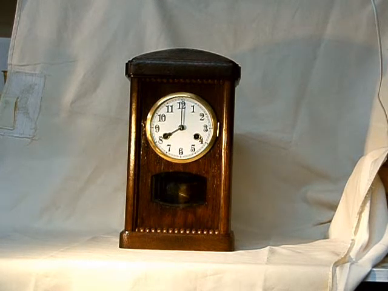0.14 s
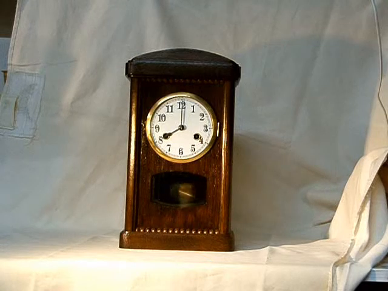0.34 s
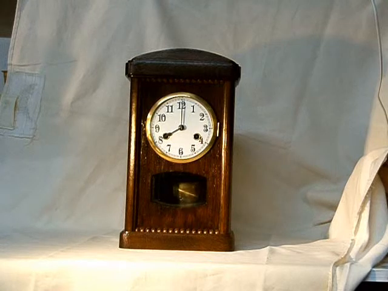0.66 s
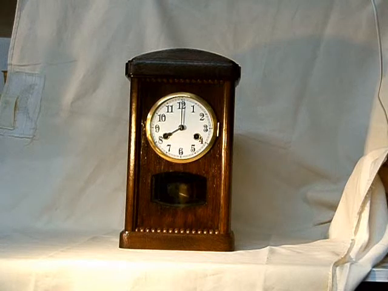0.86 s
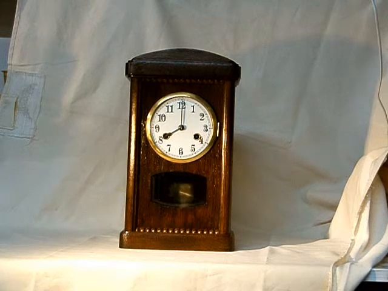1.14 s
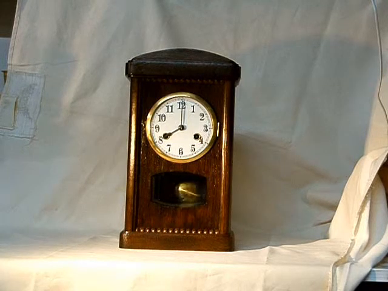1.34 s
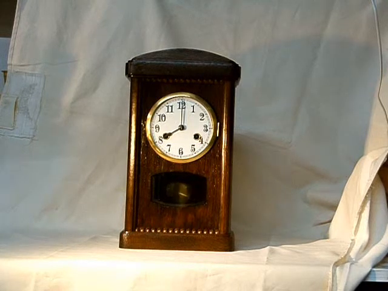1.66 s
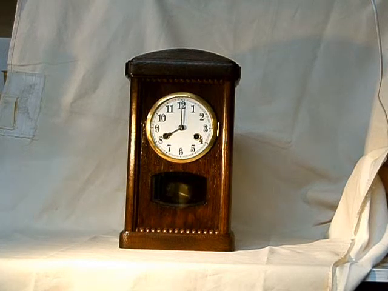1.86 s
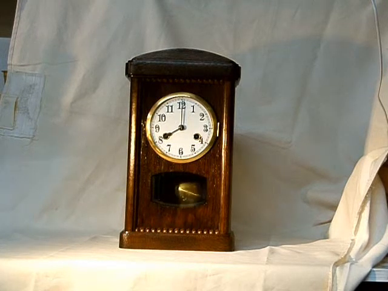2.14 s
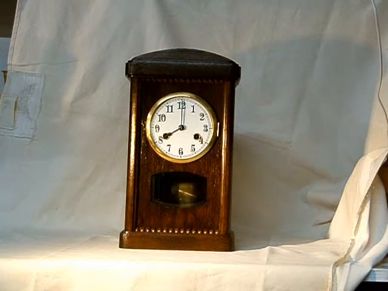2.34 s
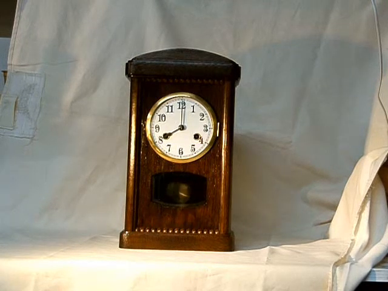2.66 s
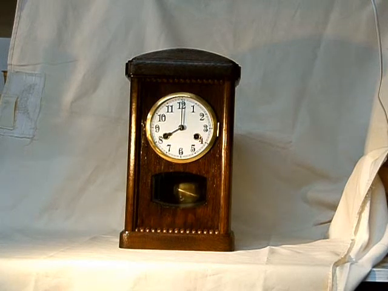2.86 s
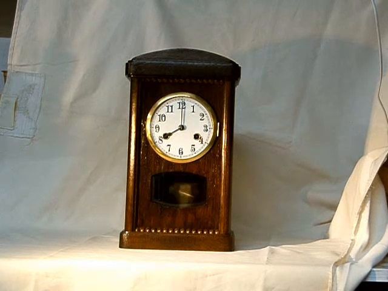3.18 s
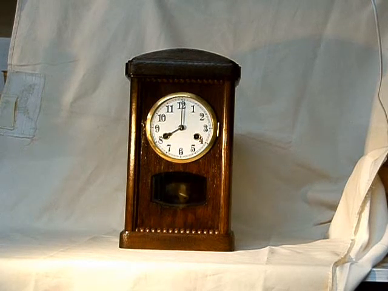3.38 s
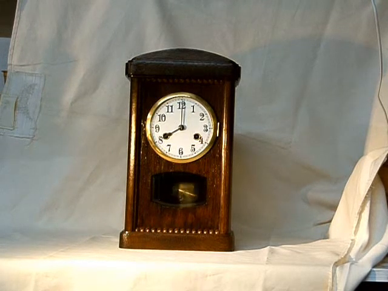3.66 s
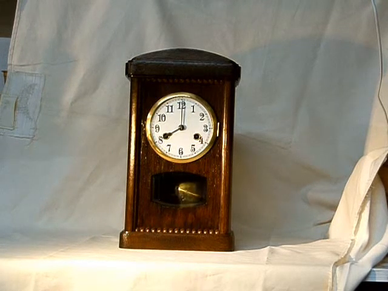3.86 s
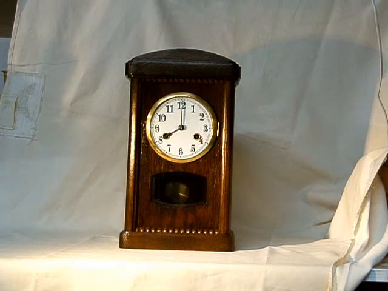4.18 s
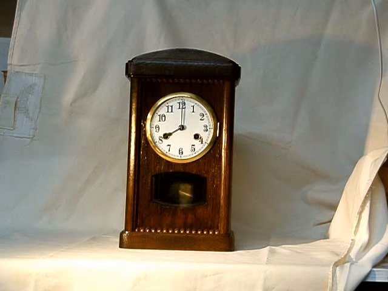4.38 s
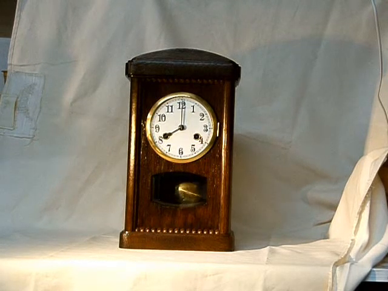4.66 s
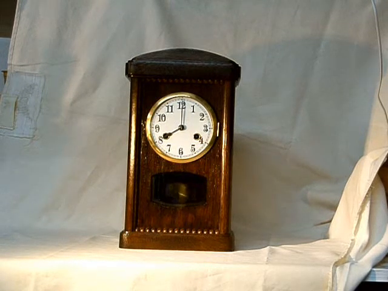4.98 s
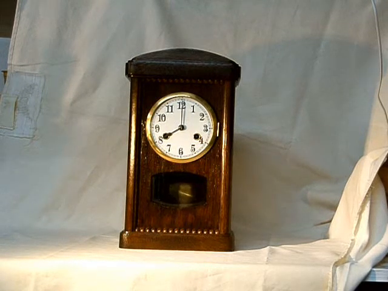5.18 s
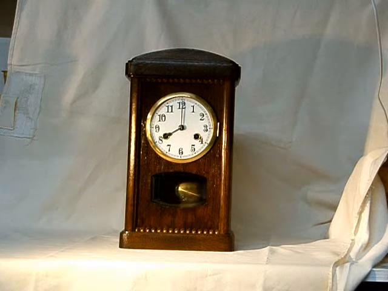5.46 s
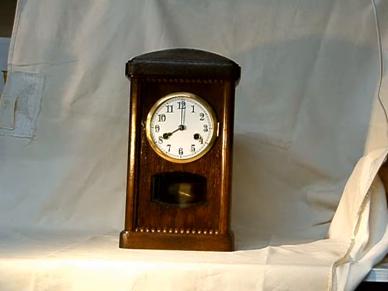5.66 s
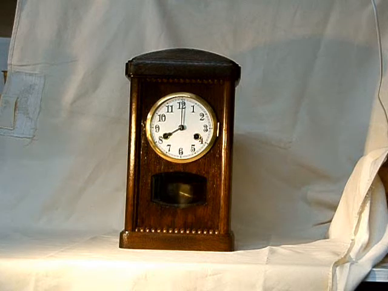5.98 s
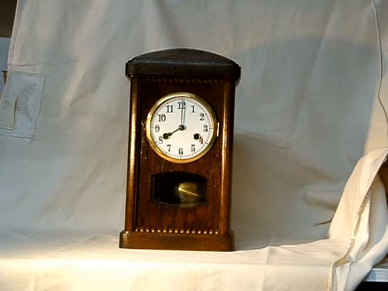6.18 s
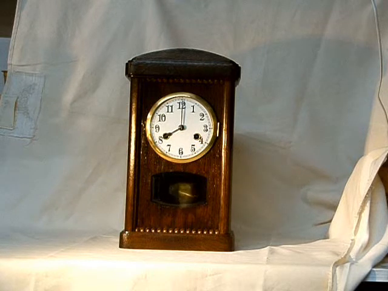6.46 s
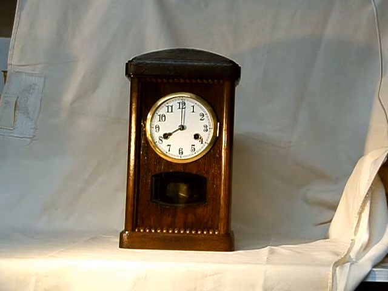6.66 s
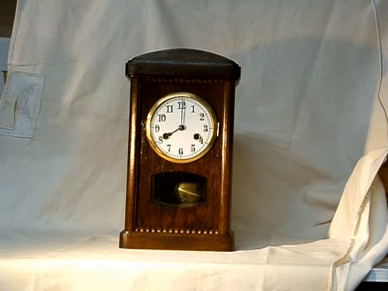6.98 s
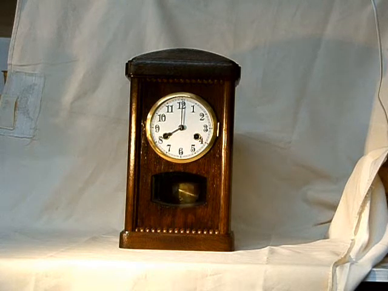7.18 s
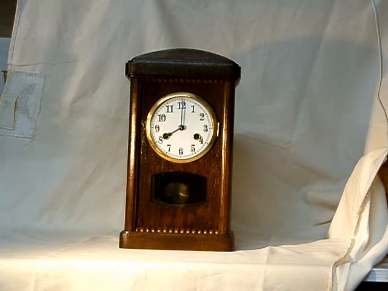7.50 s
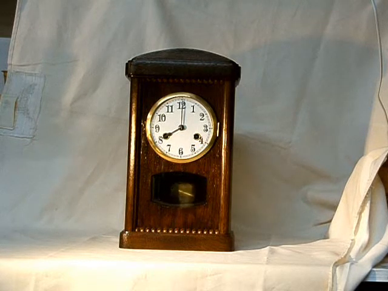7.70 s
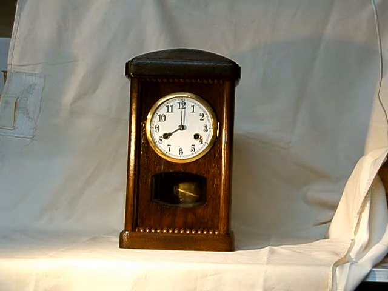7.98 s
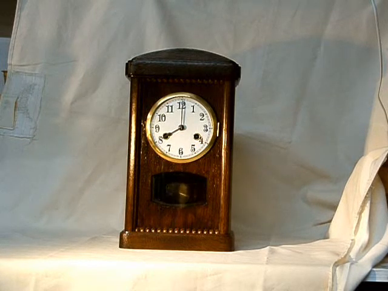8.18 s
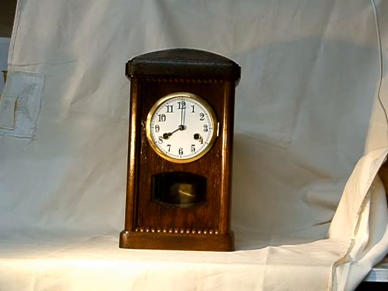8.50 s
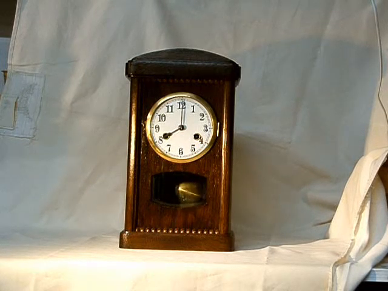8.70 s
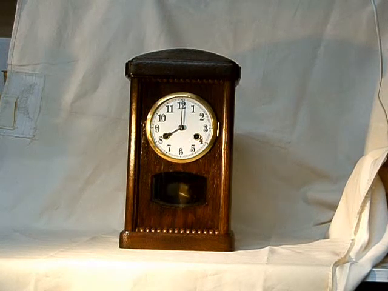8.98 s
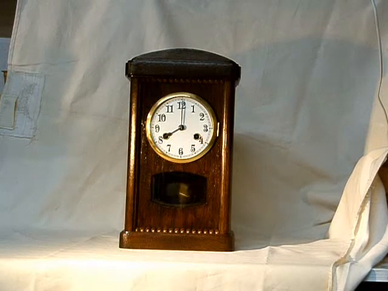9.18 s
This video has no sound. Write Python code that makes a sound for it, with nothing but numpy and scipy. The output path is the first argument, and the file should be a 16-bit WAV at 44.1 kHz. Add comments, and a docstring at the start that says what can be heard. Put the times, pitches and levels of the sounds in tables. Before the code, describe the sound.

A wooden mantel clock is partway through striking the hour, its wire gong already ringing. A padded hammer hits five more times, evenly, about a second and a half apart. Each blow knocks the case and adds a shimmering metallic tone to the lingering ring. Two faint lever clicks come early on, and a last one follows the strokes as the gong fades. The room is small and quiet, with steady microphone hiss.

```python
"""A wooden mantel clock is striking in a quiet room, heard through a hissy mono microphone.
At first its coiled wire gong still rings from earlier strokes. Then a padded hammer hits it five
more times, about 1.5 s apart, with two faint lever clicks along the way. Each blow knocks the case
and adds to what still rings, so every stroke has its own colour.
Last, the striking gears stop with a faint click while the gong rings on."""
import sys
import numpy as np
from scipy import signal
from scipy.fft import rfft, irfft, next_fast_len
from scipy.io import wavfile

SR = 44100
rng = np.random.default_rng(int(sys.argv[2]) if len(sys.argv) > 2 else 0)


def wav_out(sig):
    """Save sig, one row per channel (or a flat mono array), as 16-bit PCM at SR to the path in sys.argv[1]."""
    wavfile.write(sys.argv[1], SR, np.round(np.clip(np.atleast_2d(sig).T, -1, 1) * 32767).astype(np.int16))


N = 411894
TIME = np.arange(N) / SR
TOP_HZ = 15450  # the recorder cuts off sound above this pitch

# microphone hiss and room rumble: (frequency [Hz], relative level [dB])
HISS_SHAPE = [(30, -5.5), (70, -4), (140, 1.5), (250, 4), (550, 1.5), (1000, -0.5), (1900, -2), (2400, -2),
              (3000, -4.5), (5000, -5.5), (8000, -8.5), (11000, -11), (15000, -15.5)]
# thin electronic whine: (frequency [Hz], level [dB])
WHINE_TONES = [(7843, -65), (7873, -64), (8129, -66), (8158, -65)]
# clicks of the levers in the clockwork: (time [s], level [dB], centre frequency [Hz])
LEVER_CLICKS = [(.458, -48, 4300), (2.812, -55, 2700), (8.434, -45, 2100), (8.438, -45, 520),
                (8.462, -48, 900)]
# A mode is one tone that an object rings at. Its fade time, t60, is how long it takes to drop 60 dB.
# modes of the wooden case: (frequency [Hz], relative level [dB], fade time [s])
CASE_MODES = [(208, -51, 0.09), (330.6, -35.5, 0.14), (520, -47, 0.14), (750, -46, 0.081),
              (1116, -41, 0.059), (1717, -39, 0.068), (2210, -43, 0.053), (2514, -37, 0.033),
              (2863, -46, 0.069), (3330, -41.5, 0.064)]
# loudness along the "ladder", the gong's row of high modes: (frequency [Hz], relative level [dB])
LADDER_SHAPE = [(8800, -64), (9500, -59), (10100, -61), (11250, -64), (11900, -71), (12740, -56),
                (13600, -57.5), (13960, -53), (14300, -61), (14630, -57.5), (15400, -65)]
# strong modes of the gong: (frequency [Hz], relative level [dB], fade time [s],
# share of the ringing that survives a blow [0-1], rise time [s], pitch bend under the hammer [Hz])
GONG_MODES = [(230.19, -42, 7.1, 1, .04, 0), (389.95, -26.3, 1.1, .8, .007, -42),
              (584.75, -51, 22, 1, .03, 0), (816.24, -33.9, 5.5, 1, .016, -35),
              (1081.16, -41.2, 14.6, .67, .008, 0), (1373.49, -37.7, 8.4, .7, .03, 0),
              (1694.88, -48.2, 11.2, 1, .006, 10), (2041.17, -38.1, 7.8, 1, .005, 12),
              (2418.79, -43, 6, .94, .055, 0), (2824.72, -44.3, 6.8, 1, .005, 0),
              (3260.94, -43.7, 4.3, .99, .006, 42), (3730.77, -55, 5.2, .84, .008, 0),
              (4759.37, -52.3, 3.2, .83, .008, 0), (6520.61, -55.3, 3, .86, .008, 0)]
# hammer strokes; those at negative times are already ringing when the sound begins:
# (time [s], force [dB], brightness [dB per octave], sizzle of the contact [dB])
HAMMER_STROKES = [(-2.078128, 4, .6, 0), (-.598251, -1, -.4, 0), (.921546, -1.5, -.1, 2.5),
                  (2.419508, -1.4, -.5, -2), (3.907069, -1.2, -.3, 0), (5.423786, -1, .6, 2),
                  (6.932008, .1, .1, -1)]


def undb(db):
    """Turn decibels into a number to multiply a sound by."""
    return 10 ** (np.asarray(db) / 20)


def fade(age, t60):
    """A natural fade that is 60 dB down after t60 seconds."""
    return np.exp(-np.log(1000) * age / t60)


def swell(age, hz, rise):
    """The start of a mode: low bending waves travel more slowly, so they arrive after the high ones."""
    lag_s = 0.0044  # how far a 250 Hz wave trails the treble
    delay = lag_s * max(np.sqrt(1000 / hz) - .7, 0) / 1.3
    return 1 - np.exp(-np.maximum(age - delay, 0) / rise)


def add(out, sound, start):
    """Mix a sound in at a start time, cut to the length of the track."""
    i = int(round(start * SR))
    lo, hi = max(i, 0), min(i + len(sound), N)
    if hi > lo:
        out[lo:hi] += sound[lo - i:hi - i]


def noise(shape, size):
    """Noise of strength 1, coloured by points of (frequency [Hz], relative level [dB])."""
    hz, db = np.transpose(shape)
    padded = next_fast_len(size)
    bins = np.maximum(np.fft.rfftfreq(padded, 1 / SR), 1)
    gains = undb(np.interp(np.log(bins), np.log(hz), db))
    coloured = irfft(rfft(rng.standard_normal(padded)) * gains, padded)[:size]
    return coloured / coloured.std()


def ring(modes, size, rise):
    """Pure tones that swell and fade, from rows of (frequency [Hz], level [dB], fade time [s])."""
    age, out = TIME[:size], np.zeros(size)
    for hz, db, t60 in modes:
        tone = np.sin(2 * np.pi * (hz * age + rng.random()))
        out += undb(db) * swell(age, hz, rise) * fade(age, t60) * tone
    return out


def microphone_hiss(hiss_db=-48):
    """Steady hiss with a faint cluster of whining electronic tones."""
    whine = sum(undb(db) * np.sin(2 * np.pi * (hz * TIME + rng.random())) for hz, db in WHINE_TONES)
    return undb(hiss_db) * noise(HISS_SHAPE, N) + whine


def room(sound, echo_db, t60=.4):
    """A small furnished room adds soft echoes, starting 6 ms after the sound."""
    age = TIME[:SR // 2]
    echoes = noise([(100, -7), (3000, 7), (15000, -10)], len(age)) * fade(age, t60) * (age > .006)
    return sound + undb(echo_db) * signal.fftconvolve(sound, echoes / np.linalg.norm(echoes))[:N]


def lever_clicks(t60=0.083):
    """Small dry clicks as levers in the clockwork drop."""
    age, out = TIME[:SR // 4], np.zeros(N)
    for start, db, hz in LEVER_CLICKS:
        click = noise([(hz / 4, -36), (hz / 2, -9), (hz, 0), (hz * 2, -18), (hz * 4, -36)], len(age))
        add(out, undb(db) * click * fade(age, t60), start)
    return out


def case_knocks(knock_db=3, rise=0.0028, tap_db=-42, tap_t60=0.033):
    """The hammer taps the wire, and the blow passes through the gong's stand into the wooden case."""
    age, out = TIME[:SR // 2], np.zeros(N)
    knock = undb(knock_db) * ring(CASE_MODES, len(age), rise)
    for start, force_db, _, sizzle_db in HAMMER_STROKES:
        tap = noise([(700, -16), (1700, -27), (2400, 2), (3300, -10), (4200, -9), (12000, -28)], len(age))
        tap *= undb(tap_db + sizzle_db) * fade(age, tap_t60)
        add(out, undb(force_db) * (knock + tap), start)
    return out


def gong_shimmer(low_db=-71, high_db=-68, typical_t60=4.5, rise=0.0053, wash_db=-51, count=48):
    """The coil's many faint modes: a thin shimmer over a soft wash of noise after each stroke."""
    age, out = TIME[:3 * SR], np.zeros(N)
    place = (np.arange(count) + rng.random(count)) / count  # 0 is the lowest pitch, 1 the highest
    hz = 2200 + place * (TOP_HZ - 2200)
    db = low_db + (high_db - low_db) * place + 3 * rng.standard_normal(count)
    t60 = typical_t60 * rng.uniform(.7, 1.4, count)
    shimmer = ring(zip(hz, db, t60), len(age), rise)
    for start, force_db, _, sizzle_db in HAMMER_STROKES:
        wash = noise([(150, -20), (700, 9.5), (2300, 8), (4500, -1),
                      (6000, 3.5), (9000, 0), (14000, -25)], len(age))
        wash *= undb(wash_db) * fade(age, t60=2.9) * (1 - np.exp(-age / rise))
        add(out, undb(force_db + sizzle_db) * (shimmer + wash), start)
    return out


def gong_ladder(first_hz=8839, first_gap_hz=645.5, shrink_hz=29.6, survives=.6, rise=0.0074, count=16):
    """List the gong's high modes, which are like ladder rungs crowding together towards the top."""
    rung = np.arange(count)
    hz = first_hz + first_gap_hz * rung - shrink_hz * rung * (rung - 1) / 2
    db = np.interp(hz, *np.transpose(LADDER_SHAPE))
    t60 = np.geomspace(3, 8, count)  # higher rungs ring longer
    return [(*mode, survives, rise, 0) for mode in zip(hz, db, t60)]


def gong_mode(hz, db, t60, survives, rise, bend_hz, contact_s=0.018):
    """One mode through all strokes: a blow in step with the ringing builds it, one out of step thins it."""
    out, ringing = np.zeros(N, complex), 0j  # complex numbers hold both the size and timing of a swing
    spin_and_fade = 2j * np.pi * hz - np.log(1000) / t60
    octaves = np.log2(min(hz, 5000) / 1000)  # brightness treats all modes above 5000 Hz alike
    sizzle_share = 0.4 * hz / TOP_HZ
    ends = [stroke[0] for stroke in HAMMER_STROKES[1:]] + [N / SR]
    for (start, force_db, bright_db, sizzle_db), end in zip(HAMMER_STROKES, ends):
        span = slice(*np.searchsorted(TIME, [start, end]))
        age = TIME[span] - start
        blow = undb(db + force_db + bright_db * octaves + sizzle_db * sizzle_share)
        # while the pad touches the wire, it muffles the old ringing and bends the new pitch
        contact = np.exp(-age / contact_s)
        old = ringing * (survives + (1 - survives) * contact)
        new = blow * swell(age, hz, rise) * np.exp(-2j * np.pi * bend_hz * contact_s * contact)
        out[span] = (old + new) * np.exp(spin_and_fade * age)
        ringing = (ringing * survives + blow) * np.exp(spin_and_fade * (end - start))
    return np.real(out * np.exp(2j * np.pi * rng.random()))


def gong(gain_db=0.38, top_beat_depth=0.21, typical_beat_hz=5):
    """The coiled wire rings; the higher a mode, the more it beats (wavers) with a close neighbour."""
    out = np.zeros(N)
    for hz, *settings in GONG_MODES + gong_ladder():
        pace, phase = rng.random(2)
        beat = np.sin(2 * np.pi * (typical_beat_hz * (.5 + pace) * TIME + phase))
        out += gong_mode(hz, *settings) * (1 + top_beat_depth * hz / TOP_HZ * beat)
    return undb(gain_db) * out


def scene():
    """The clock in its room, the same in both channels."""
    tone = room(gong(), echo_db=-28)
    clatter = room(gong_shimmer() + case_knocks() + lever_clicks(), echo_db=-8)
    mono = tone + clatter + microphone_hiss()
    return np.array([mono, mono])


def record(dry, offset=.0158):
    """The recorder cuts the highest treble and shifts the whole wave slightly above zero."""
    treble_cut = signal.ellip(14, .1, 80, TOP_HZ, fs=SR, output="sos")
    return signal.sosfilt(treble_cut, dry) + offset


dry = scene()
out = record(dry)
wav_out(out)
```